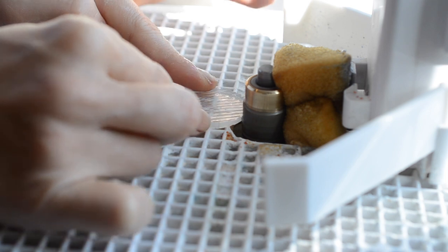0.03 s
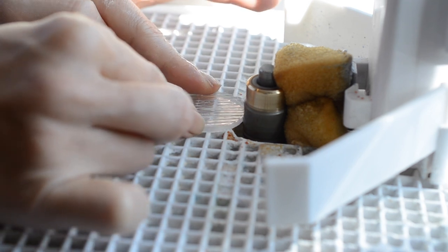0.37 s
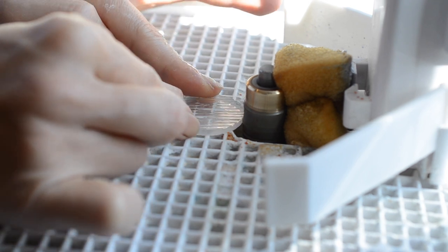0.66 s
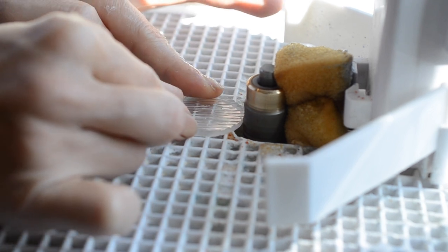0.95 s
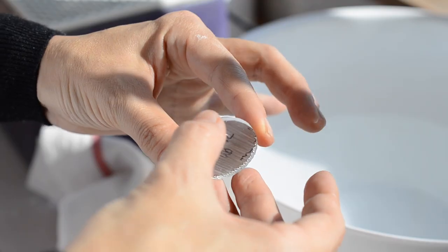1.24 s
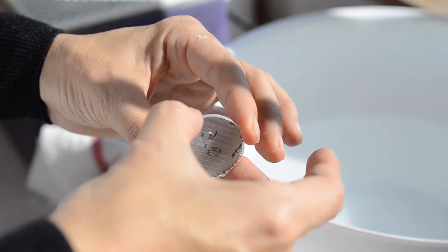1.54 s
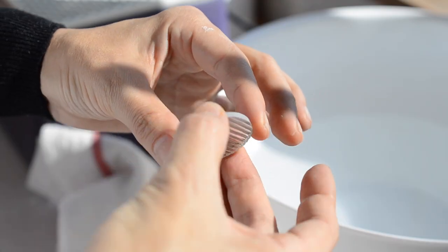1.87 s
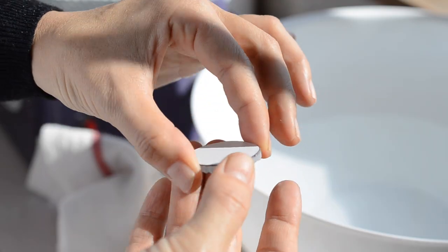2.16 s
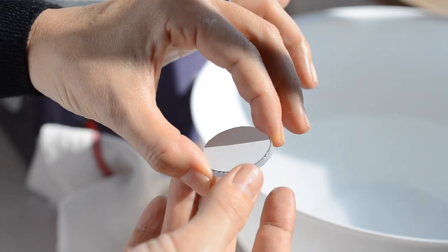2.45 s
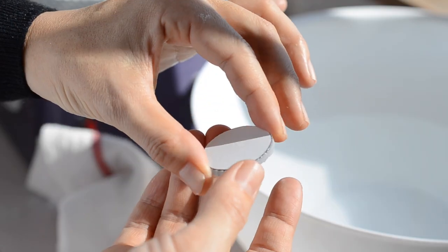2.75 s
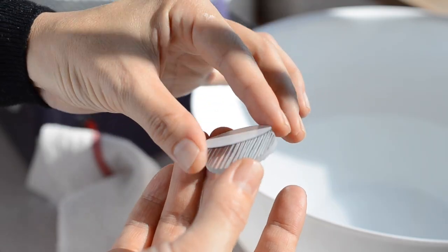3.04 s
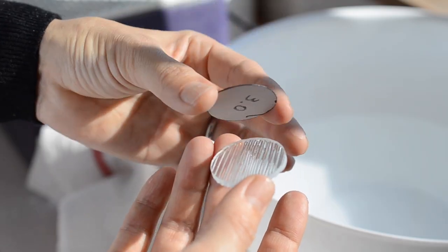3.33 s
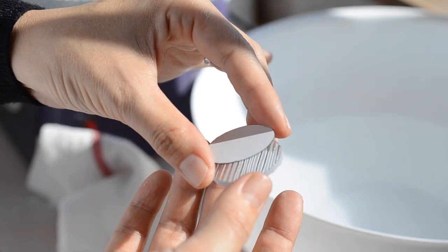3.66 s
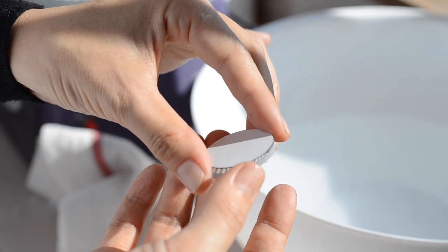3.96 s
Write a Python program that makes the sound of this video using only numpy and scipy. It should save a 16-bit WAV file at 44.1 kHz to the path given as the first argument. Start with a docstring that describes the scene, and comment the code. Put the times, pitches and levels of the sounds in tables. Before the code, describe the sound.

Close up in a workshop, a grinder works a glass edge with a buzzing whine, gritty scraping and a thin high ring. It quickly dies away, and soft finger rubs and tiny ticks follow over low hum and fan noise.

```python
"""In a workshop, close by, a bench grinder's diamond head works the edge of a small glass disc.
Every turn of the shaft rattles the housing and drags the same grit over the glass, which sings
near 10 kHz. After about a second the grinding fades out with a soft bump. The quiet room
follows, with mains hum, a fan and fingers handling the glass."""
import sys
import numpy as np
from scipy import signal
from scipy.fft import rfft, irfft
from scipy.io import wavfile
from scipy.ndimage import uniform_filter1d

SR = 44100
rng = np.random.default_rng(int(sys.argv[2]) if len(sys.argv) > 2 else 0)


def file_out(sig):
    """Save sig as 16-bit WAV at sys.argv[1]."""
    # one column per channel
    cols = np.atleast_2d(sig).T
    # limit, then scale
    lim = np.clip(cols, -1, 1)
    pcm = np.round(lim * 32767).astype(np.int16)
    wavfile.write(sys.argv[1], SR, pcm)


N = 176400
GRINDING = int(1.2 * SR)  # samples made for the grinder

# how fast the shaft turns, sagging a little under load (time [s], speed [turns per s])
SHAFT_SPEED = [(0, 57.24), (.15, 57.2), (.27, 57.08), (.5, 57.2), (.62, 57.13), (.85, 57.27), (1.1, 57.25)]
# tones of the turning head (multiple of the shaft speed [-], base level [dB])
SHAFT_TONES = [(2, -72.5), (3, -68.0), (4, -77.0), (5, -56.9), (6, -53.7), (7, -57.1), (8, -51.9),
               (9, -60.5), (10, -66.2), (11, -62.3), (12, -60.3), (13, -55.3), (14, -56.7), (15, -50.3),
               (16, -48.6), (17, -45.5), (18, -59.1), (19, -57.2), (20, -52.8), (21, -54.7), (22, -59.2),
               (23, -59.9), (24, -62.0), (25, -53.0), (26, -60.2), (27, -55.2), (28, -50.7), (29, -56.1),
               (30, -45.5), (31, -47.2), (32, -56.3), (33, -55.4), (34, -52.6), (35, -53.6), (36, -60.7),
               (37, -49.0), (38, -53.8), (39, -50.5), (40, -49.7), (41, -46.7), (42, -54.0), (43, -56.2),
               (44, -47.6), (45, -50.5), (46, -53.3), (47, -52.9), (48, -53.3), (49, -48.1), (50, -57.4),
               (51, -60.3), (52, -47.8), (53, -51.0), (54, -56.4), (55, -60.7), (59, -59.4), (65, -60.5),
               (70, -61.5), (71, -59.4), (73, -61.2), (74, -55.9), (75, -62.1)]
# where in each turn the machine rattles (from frequency [Hz], place [turns], phase scatter [rad])
RATTLES = [(0, 0.247, 0.63), (650, .71, 0.8), (1500, 0.94, 1.5), (2053, .7, 2.1), (3200, 0.719, 1.17)]
# swell of the whine around 855 Hz (time [s], gain [dB])
WHINE_SWELL = [(0, -3.5), (.2, -4), (.35, -1.5), (.55, -0.5), (.7, 2), (1.1, 2)]
# how hard the glass presses on the head; the whine follows half as much (time [s], gain [dB])
PRESSURE = [(0, 0.2), (.16, 0.3), (.29, -0.1), (.4, -1.2), (.55, -0.5), (.66, -1.2), (.8, -3), (1.1, -1.5)]
# how glass and housing answer the grit (frequency [Hz], relative level [dB])
BODY_COLOUR = [(30, -25.5), (200, -19), (290, -9.5), (440, -4), (560, -15), (760, -6.5), (980, -7),
               (1080, -10), (1300, -5.5), (1650, -4.5), (1900, 2), (2050, -4), (2300, -1), (2700, 0),
               (3050, 0.5), (3250, -6.5), (3850, -5), (4250, -5), (4550, -10.5), (5300, -11.5), (5700, -18),
               (6300, -12), (6900, -20), (7150, -15), (7800, -20.5), (9400, -30.5), (10600, -50),
               (11600, -61), (12700, -33), (14200, -52), (15600, -42)]
# lean of the machine to the left; each ear gets a share of it (frequency [Hz], lean [dB])
MACHINE_LEAN = [(120, -2.5), (240, -2.9), (350, 1), (470, -4.5), (620, -3), (740, -2.5), (1000, -0.5),
                (1200, -0.8), (1550, -.5), (1750, 2.3), (2000, -1), (2400, -0.9), (5000, -0.5)]
# echoes off the bench against the direct sound (frequency [Hz], gain [dB])
BENCH_ECHO = [(250, -25), (500, -8), (700, -9), (1500, -25.5), (4000, -25.5), (7000, -52), (9000, -7),
              (15000, -14)]
# fingers shifting on the glass (middle time [s], length [s], level [dB])
RUBS = [(1.31, 0.11, -62.5), (3.317, .13, -63.5), (3.59, 0.05, -71)]
# tone colour of skin on glass (frequency [Hz], relative level [dB])
RUB_COLOUR = [(300, -18), (900, 11), (1400, 2.5), (3000, -3.5), (4500, -15.5), (7000, -35), (14000, -44)]
# light touches of glass and fingernail (time [s], level [dB], pitch [Hz], width [Hz], decay [s])
TICKS = [(1.648, -65, 2980, 550, .005), (3.086, -78, 5750, 2500, .018), (3.3, -65, 2500, 1500, .004),
         (3.57, -73, 2100, 1500, .004), (3.939, -68, 1650, 700, .005)]
# steady tones of the mains hum (frequency [Hz], level [dB])
HUM_TONES = [(119.6, -64.5), (179.5, -70), (359.5, -71), (539, -74), (599.6, -61.5), (659.5, -76),
             (719.6, -65), (779.5, -75), (839.6, -74.5), (959.6, -69), (1019.5, -75.5), (1319.4, -75.5),
             (1859, -79.5), (1979, -87), (2159, -79)]
# tone colour of the room's air (frequency [Hz], relative level [dB])
AIR_COLOUR = [(15, -6), (25, 4.5), (42, -3.5), (62, 6), (90, -4.5), (140, 1.5), (210, -5), (275, 5.5),
              (350, -1), (450, 0), (560, -8), (750, -4), (1000, -9), (1150, -8.5), (1320, -9.5),
              (1600, -14), (2200, -15.5), (3000, -20), (3500, -26.5), (4400, -30), (5300, -35.5),
              (5700, -42.5), (6200, -37.5), (9000, -41), (14000, -49.5), (15000, -66)]
# how wide the air sounds, side against middle (frequency [Hz], gain [dB])
AIR_WIDTH = [(60, -13.5), (280, -10), (480, -4.5), (900, -4.5), (2800, -21), (4500, -5.5), (9000, -4)]


def grinder():
    """The machine's whine and grit, their echoes off the bench and the singing glass, fading out."""
    fade_from_s, silent_s = 0.8, 1.157
    t = np.arange(GRINDING) / SR
    turns = np.cumsum(curve(SHAFT_SPEED)) / SR
    direct = whine(turns) + grit(turns)
    echoes = rng.standard_normal(GRINDING) * np.exp(-t / 0.01)
    reflected = signal.fftconvolve(direct, echoes / np.linalg.norm(echoes))[:GRINDING]
    left, right = widen(direct, colour(reflected, BENCH_ECHO))
    machine = np.array([colour(left, MACHINE_LEAN, share=0.38), colour(right, MACHINE_LEAN, share=-0.48)])
    fade = np.clip((silent_s - t) / (silent_s - fade_from_s), 0, 1)
    return np.pad(fade * (machine + singing_glass()), ((0, 0), (0, N - GRINDING)))


def whine(turns):
    """Wavering tones at multiples of the shaft speed line up into a few rattles on every turn."""
    swell_hz, swell_width_hz, flicker_hz = 855, 116, 21.7
    swell, shaft_hz = curve(WHINE_SWELL), np.mean(curve(SHAFT_SPEED))
    out = 0
    for multiple, db in SHAFT_TONES:
        hz = multiple * shaft_hz
        _, place, scatter = [row for row in RATTLES if row[0] <= hz][-1]
        jitter = 0.16 * hz / 2000 * wander(flicker_hz, GRINDING)  # higher tones are less steady
        phase = 2 * np.pi * multiple * (turns - place) + scatter * rng.standard_normal() + jitter
        swell_db = swell * np.exp(-((hz - swell_hz) / swell_width_hz) ** 2)
        flicker_db = 1.4 * wander(flicker_hz / 2, GRINDING)
        out = out + undb(db + swell_db + flicker_db) * np.cos(phase)
    return np.sqrt(2) * undb(0.66 + curve(PRESSURE) / 2) * out


def grit(turns):
    """Diamond grains chip the glass; bright chips partly repeat each turn, hardest at the high spot."""
    base_db, repeat_share, split_hz = -38, 0.44, 3940
    bite_db, high_spot_turns = 2.5, 0.71
    one_turn, fresh = grains(int(SR / SHAFT_SPEED[0][1])), grains(GRINDING)
    repeating = one_turn[(turns % 1 * len(one_turn)).astype(int)]
    chips = np.sqrt(repeat_share) * repeating + np.sqrt(1 - repeat_share) * fresh
    bite = unit(undb(bite_db * np.cos(2 * np.pi * (turns - high_spot_turns))))
    dull = signal.sosfiltfilt(signal.butter(6, split_hz, "low", fs=SR, output="sos"), fresh)
    bright = signal.sosfiltfilt(signal.butter(6, split_hz, "high", fs=SR, output="sos"), chips * bite)
    return undb(base_db + curve(PRESSURE)) * unit(colour(dull + bright, BODY_COLOUR))


def singing_glass():
    """Grit rings the disc's high note unevenly; it reaches the two ears out of step."""
    base_db, likeness, lag_rad = -52.5, 0.71, 0.78
    # the complex (Hilbert) form lets one multiplication shift the phase
    right, unrelated = (signal.hilbert(ring(grains(GRINDING), hz=10050, width_hz=135)) for _ in range(2))
    left = (likeness * right + np.sqrt(1 - likeness ** 2) * unrelated) * np.exp(-1j * lag_rad)
    flicker_db = 1.34 * wander(70, GRINDING)
    return np.real([left, right]) * pan(db=-3) * undb(base_db + curve(PRESSURE) + flicker_db)


def bump(t):
    """A soft low bump as the grinding dies away."""
    at_s, length_s, hz, db = 1.108, 0.014, 146, -58
    return undb(db) * np.exp(-((t - at_s) / length_s) ** 2) * np.sin(2 * np.pi * hz * (t - at_s))


def fingers(t):
    """Skin rubs softly on the glass, and light touches make tiny ticks."""
    rubbing = sum(undb(db) * np.exp(-2 * ((t - at_s) / length_s) ** 2) for at_s, length_s, db in RUBS)
    out = rubbing * unit(colour(grains(N), RUB_COLOUR))
    for at_s, db, hz, width_hz, decay_s in TICKS:
        dying_away = (t >= at_s) * np.exp(-np.abs(t - at_s) / decay_s)
        ringing = ring(ring(rng.standard_normal(N), hz, width_hz), hz, width_hz)
        out = out + undb(db) * dying_away * ringing
    return out


def workshop(t):
    """Mains hum and a fan's tone over the soft rush of moving air."""
    air_db = -56.5
    hum = sum(tone(t, hz, db, waver_db=0.5, jitter_rad=0.11) for hz, db in HUM_TONES)
    fan = tone(t, hz=271.3, db=-59, waver_db=0.9, jitter_rad=0.37)
    air_mid, air_side = (undb(air_db + 0.93 * wander(5.39))
                         * unit(colour(rng.standard_normal(N), AIR_COLOUR)) for _ in range(2))
    return widen(hum + fan + air_mid, colour(air_side, AIR_WIDTH))


def tone(t, hz, db, waver_db, jitter_rad):
    """A held tone that wavers a little in level and phase."""
    gain = np.sqrt(2) * undb(db + waver_db * wander(8))
    return gain * np.sin(2 * np.pi * (hz * t + rng.random()) + jitter_rad * wander(12))


def grains(count, per_s=8000, spread_db=2):
    """Tiny clicks of uneven size at random moments."""
    hits = rng.random(count) < per_s / SR
    signs = rng.choice([-1, 1], count)
    sizes = undb(spread_db * np.minimum(rng.exponential(size=count), 4))
    return unit(hits * signs * sizes)


def ring(x, hz, width_hz):
    """Make a sound ring around one pitch, at strength 1."""
    return unit(signal.lfilter(*signal.iirpeak(hz, hz / width_hz, fs=SR), x))


def colour(x, rows, share=1):
    """Turn frequencies up or down by (frequency [Hz], gain [dB]) rows, or by a share of those dB."""
    row_hz, row_db = np.array(rows, float).T
    hz = np.arange(len(x) // 2 + 1) * SR / len(x)
    db = np.interp(np.log(np.maximum(hz, 1)), np.log(row_hz), row_db)
    return irfft(rfft(x) * undb(share * db), len(x))


def wander(rate_hz, count=N):
    """A smooth random drift, typically about 1 either side of zero."""
    step = int(SR / rate_hz)
    held = np.repeat(rng.standard_normal(N // step + 2), step)
    held = held[int(step * rng.random()):][:count]
    return np.sqrt(2) * uniform_filter1d(uniform_filter1d(held, step), step)


def curve(rows):
    """Join (time [s], value) rows with straight lines for as long as the grinding lasts."""
    return np.interp(np.arange(GRINDING) / SR, *np.array(rows, float).T)


def undb(db):
    """Turn decibels into a number to multiply by."""
    return 10 ** (np.asarray(db) / 20)


def unit(x):
    """Scale to an average strength (rms) of 1."""
    return x / np.sqrt(np.mean(np.abs(x) ** 2))


def pan(db):
    """Left and right gains, db apart; below zero leans right."""
    return undb(np.array([[db], [-db]]) / 2)


def widen(mid, side):
    """Make left and right: both get the middle, and the side sets them apart."""
    return np.array([mid + side, mid - side])


def scene():
    """The grinder, then the quiet workshop."""
    room_from_s = 1.143
    t = np.arange(N) / SR
    room_in = np.clip((t - room_from_s) / 0.006, 0, 1)
    return grinder() + bump(t) + room_in * pan(db=-1.5) * (workshop(t) + fingers(t))


def record(dry):
    """Cut away the treble above 15.7 kHz."""
    return signal.sosfilt(signal.ellip(10, .1, 80, 15700, fs=SR, output="sos"), dry)


dry = scene()
out = record(dry)
file_out(out)
```